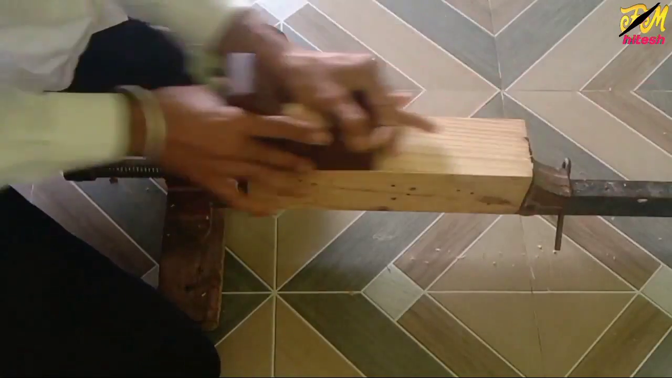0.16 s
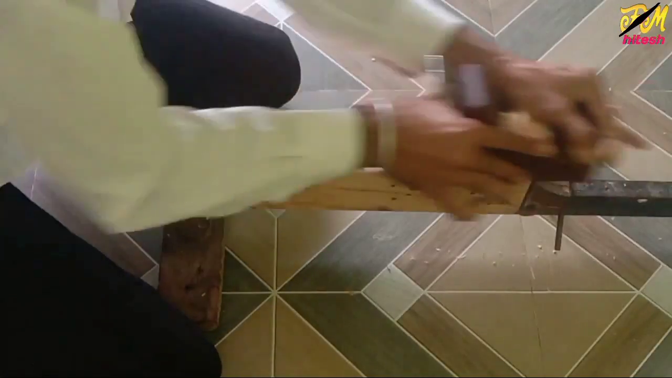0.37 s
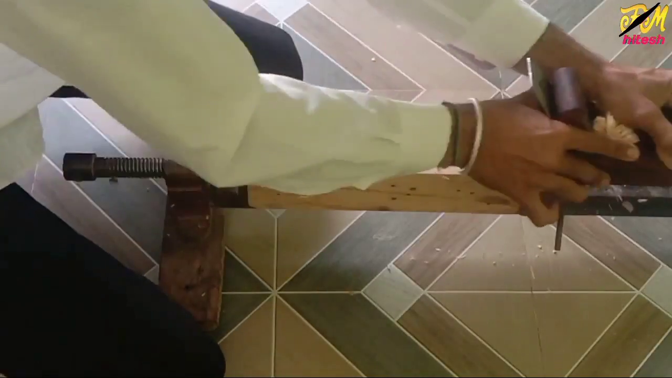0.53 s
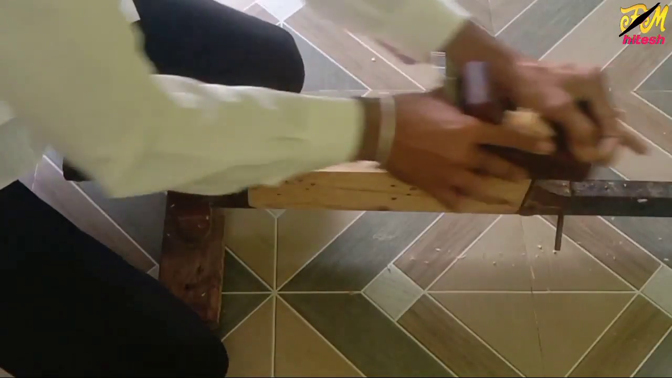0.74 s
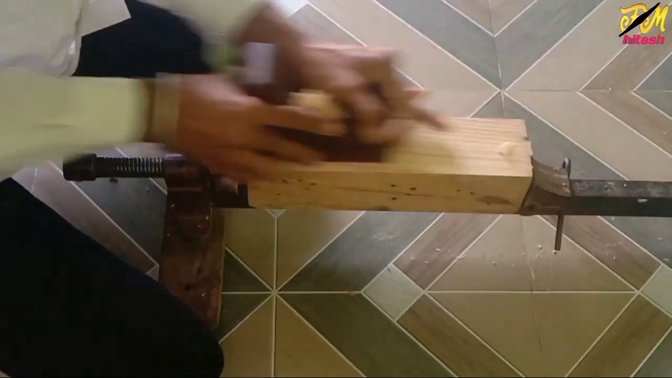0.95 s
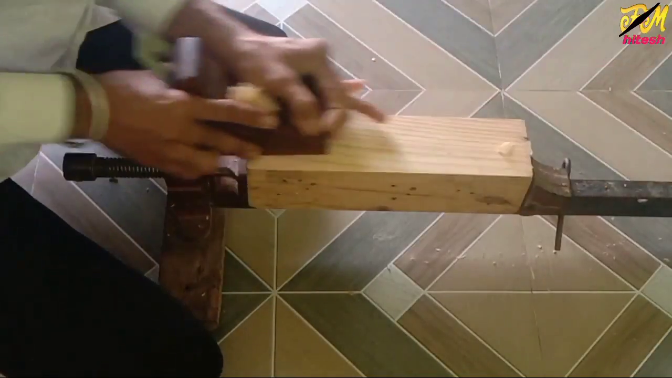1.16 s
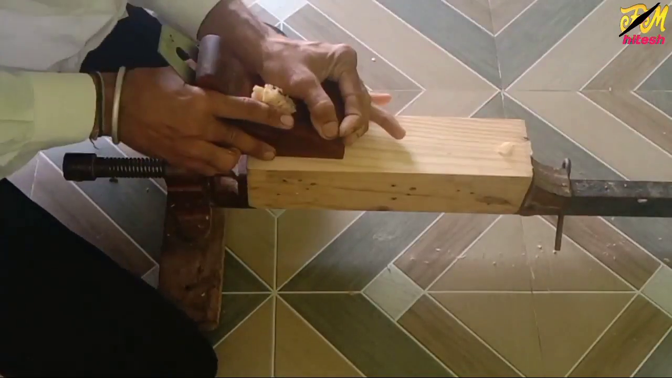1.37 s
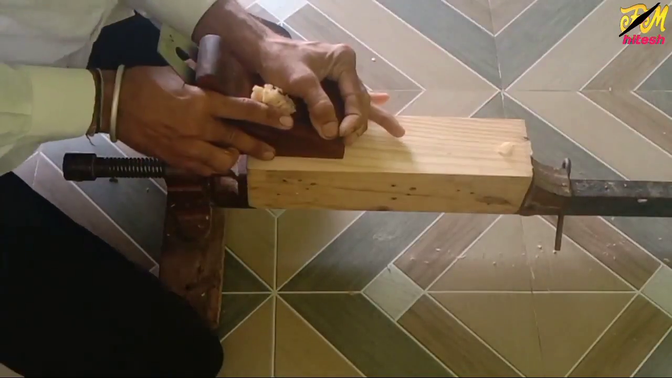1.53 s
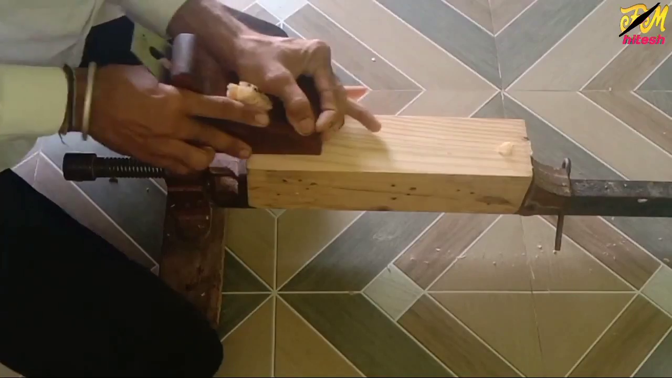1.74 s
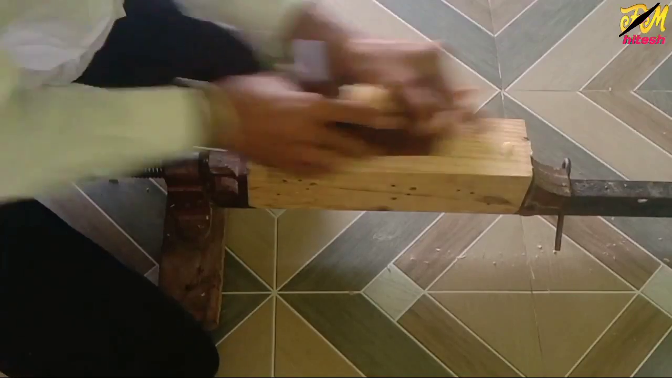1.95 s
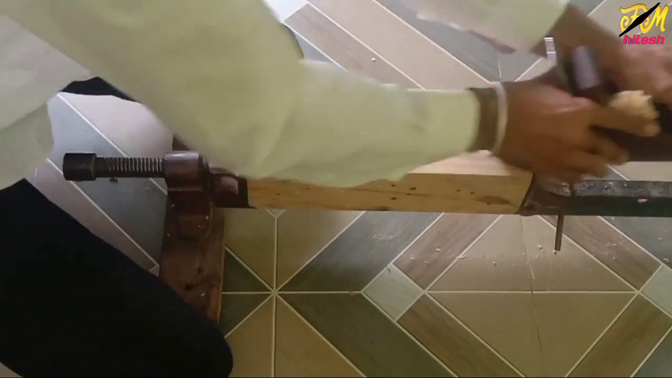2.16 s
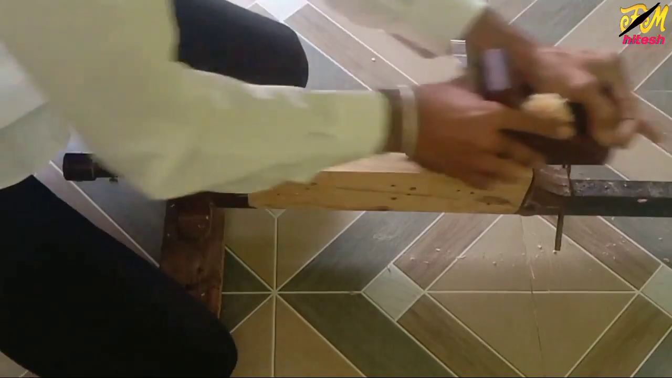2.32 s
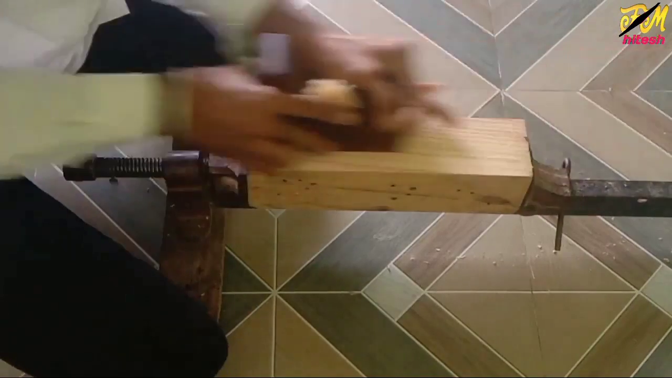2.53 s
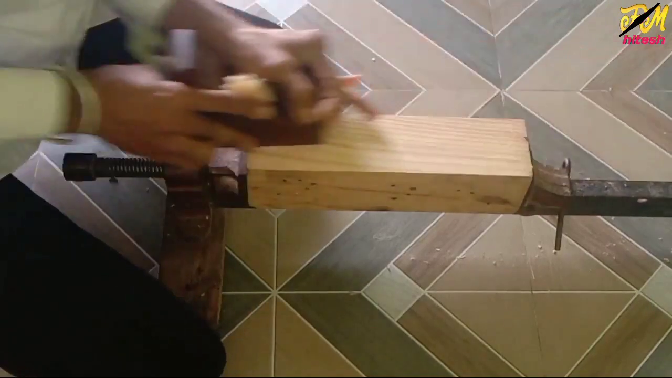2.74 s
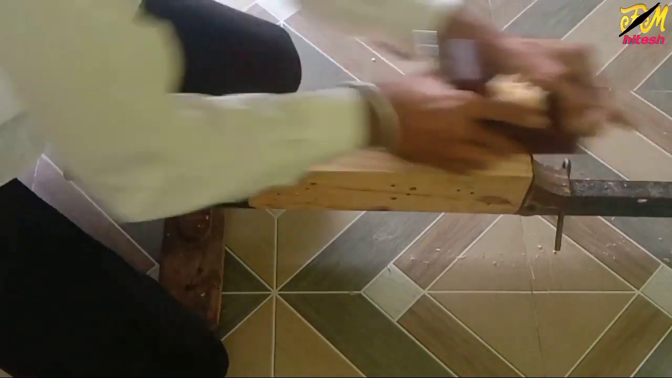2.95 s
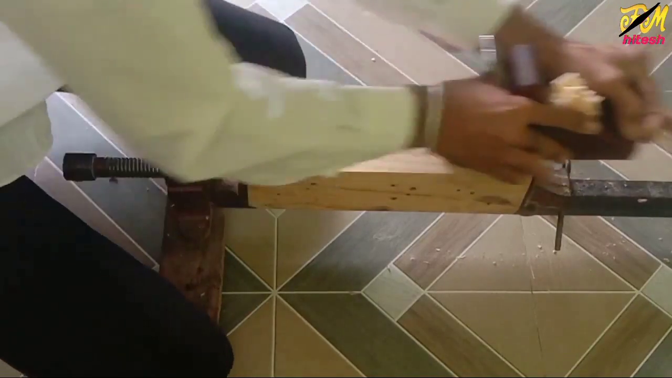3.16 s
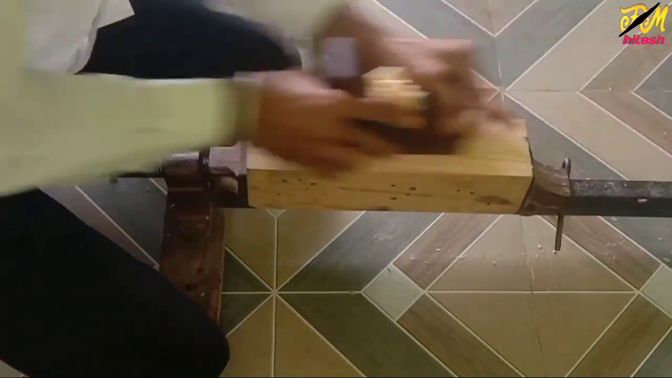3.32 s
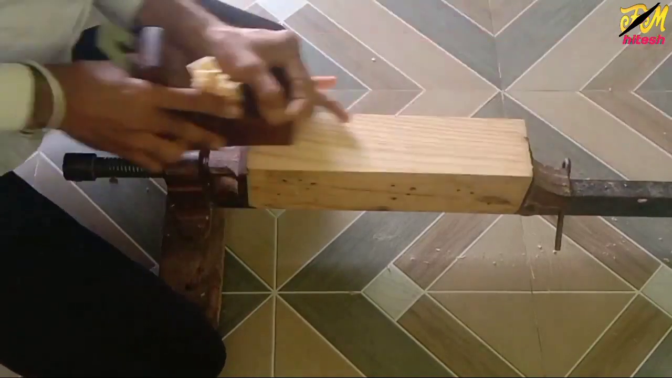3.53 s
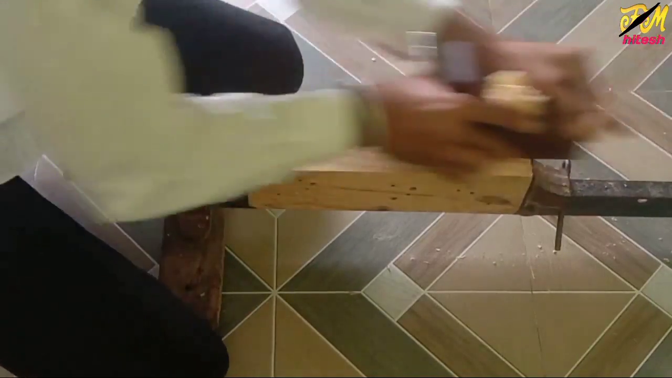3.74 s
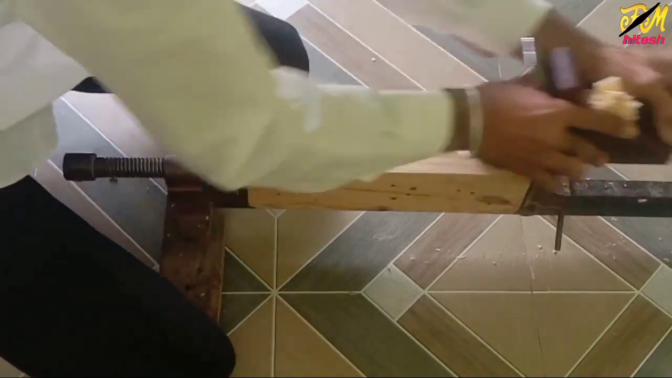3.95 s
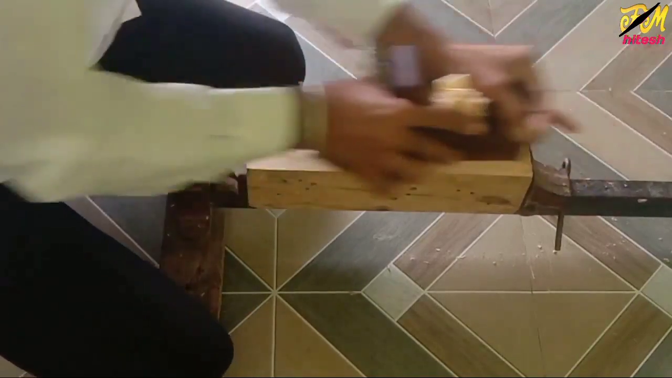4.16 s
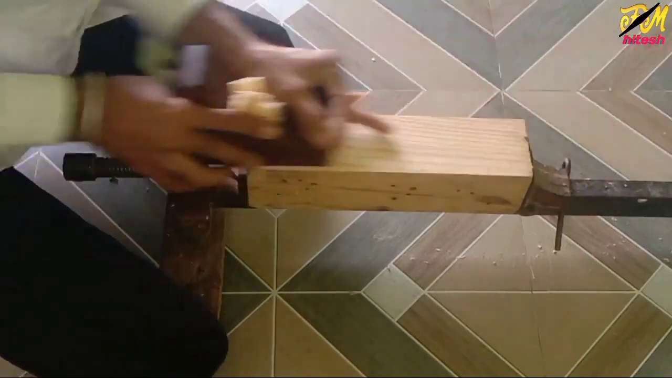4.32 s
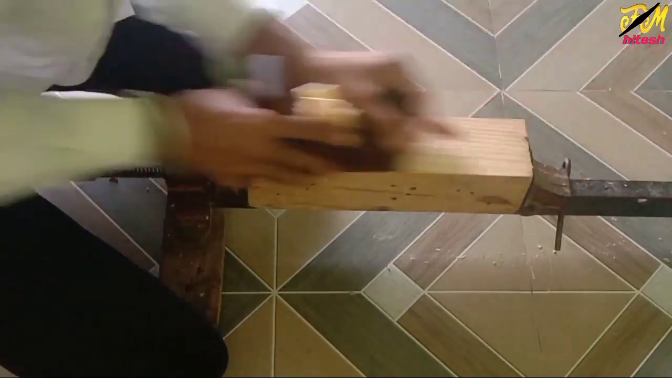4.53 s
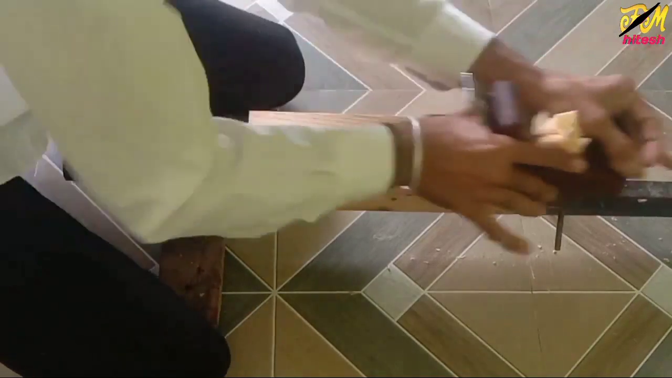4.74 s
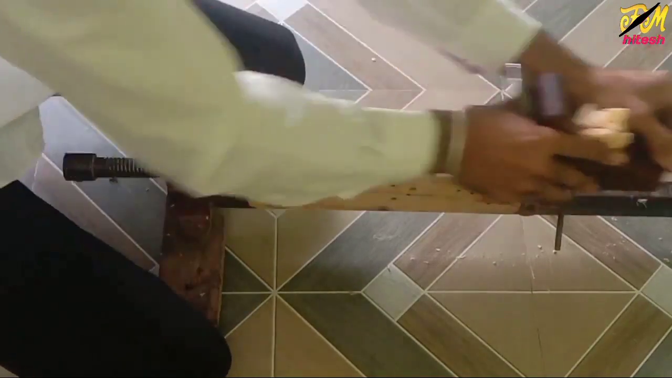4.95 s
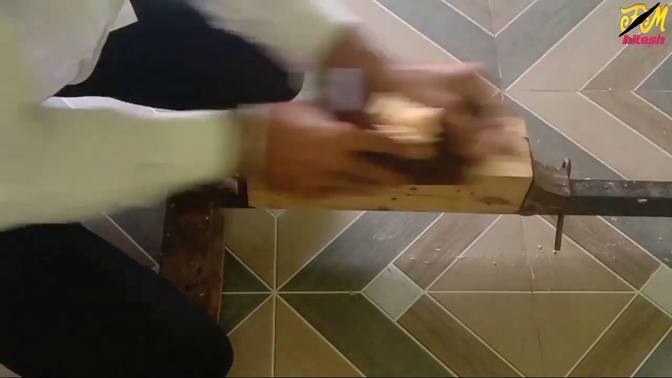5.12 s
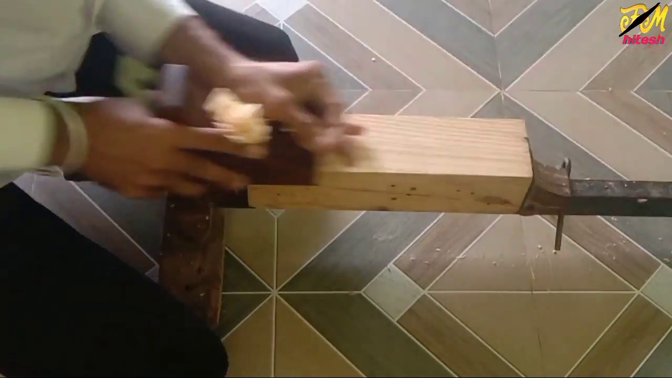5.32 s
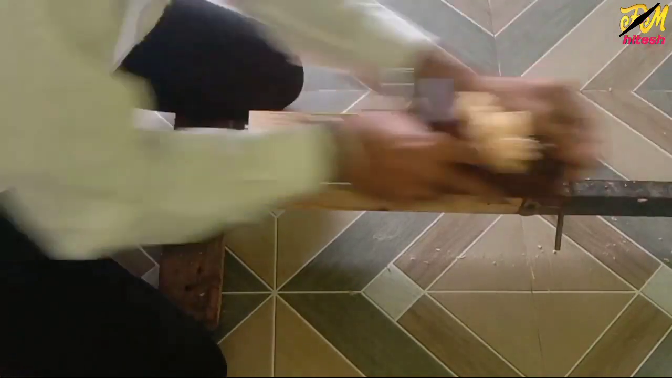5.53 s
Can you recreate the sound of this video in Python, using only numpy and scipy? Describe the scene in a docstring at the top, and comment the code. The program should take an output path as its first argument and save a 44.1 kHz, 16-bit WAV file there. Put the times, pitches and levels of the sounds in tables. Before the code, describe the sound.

A hand plane works a clamped wooden block. Crisp, tearing pushes with a hissing fizz start with a knock and alternate with softer, hollow rubbing slides back. An early push stalls almost at once, leaves a short lull, and is begun again; then the strokes follow steadily. Close, dry-edged mono sound in a bare tiled room with dense echoes and a very faint background.

```python
"""A wooden hand plane is worked along a clamped block in a bare, tiled room.
Stick-slip rubbing and fibre breakage excite the hollow body and iron as each push bites with a knock
and tears off a shaving; the plane then slides back more softly, its iron brushing the grain.
The second push stalls at once and is begun again. Jolts set the bench modes ringing, and dense echoes follow.
Table levels are those of the sources, before the gains of the mix and the room."""
import sys
import numpy as np
from scipy import signal
from scipy.fft import rfft, irfft
from scipy.io import wavfile
from scipy.ndimage import uniform_filter1d

SR = 44100
rng = np.random.default_rng(int(sys.argv[2]) if len(sys.argv) > 2 else 0)


def store_pcm(level_fs):
    """Save levels as 16-bit WAV."""
    pcm = np.round(np.clip(level_fs, -1, 1) * 32767).astype(np.int16)
    wavfile.write(sys.argv[1], SR, np.atleast_2d(pcm).T)


N = 246246
TIME = np.arange(N) / SR


def amp(db):
    """Level to amplitude: 20 dB is a factor of ten."""
    return 10 ** (np.asarray(db) / 20)


def unit(x):
    """Normalization: scales a signal to an rms of one."""
    return x / np.sqrt(np.mean(x ** 2) + 1e-20)


def ramp(t, length):
    """Linear onset: rises from zero to one over length seconds."""
    return np.clip(t / length, 0, 1)


def read(points, hz):
    """Spectral interpolation: reads levels along a log-frequency axis."""
    point_hz, value = np.transpose(points)
    return np.interp(np.log(hz + 1), np.log(point_hz + 1), value)


def add(mix, start_s, sound):
    """Superposition: adds a sound into the mix at its start time."""
    part = mix[max(round(start_s * SR), 0):][:len(sound)]
    part += sound[:len(part)]


def ring(spectrum, resonances, size=4096):
    """Minimum-phase response of energy one: a smooth spectrum lifted at each resonance."""
    hz = abs(np.fft.fftfreq(size, 1 / SR))
    db = read(spectrum, hz)
    for center_hz, width_hz, lift_db in resonances:
        db = db + lift_db / (1 + (2 * (hz - center_hz) / width_hz) ** 2)
    # the Hilbert transform of the log magnitude gives the causal phase
    log_response = np.conj(signal.hilbert(np.log(amp(db))))
    response = np.fft.ifft(np.exp(log_response)).real[:size // 2]
    return response / np.linalg.norm(response)


def sound_of(force, spectrum, resonances):
    """Linear response: a force convolved with the impulse response of a resonant body."""
    return signal.oaconvolve(force, ring(spectrum, resonances))[:N]


def resonate(x, hz, width):
    """Heterodyne resonance: a one-pole filter, of gain one, that follows the curve hz."""
    turn = np.exp(2j * np.pi * np.cumsum(hz) / SR)
    r = np.exp(-np.pi * width / SR)
    return 2 * (turn * signal.lfilter([1 - r], [1, -r], x / turn)).real


def unevenness(rate_hz, depth_db):
    """Random modulation: force swings as the contact crosses the grain, in a band below about rate_hz."""
    ratio = np.fft.rfftfreq(N, 1 / SR) / rate_hz
    spectrum = rfft(rng.standard_normal(N)) * ratio / (1 + ratio ** 2) ** 2
    swing = unit(irfft(spectrum, N))
    return unit(amp(depth_db * np.clip(swing, -2, 2)))


def slips(per_s, spread_db):
    """Shot noise: tiny slips and breaks at random moments; a positive spread makes a few far larger."""
    sizes = amp(spread_db * np.minimum(rng.exponential(1, N), 4))
    signs = rng.choice([-1, 1], N)
    happens = rng.random(N) < per_s / SR
    return unit(sizes * signs * happens)


# spectrum of the faint background: frequency_hz, relative_level_db
HUSH_SPECTRUM = [(30, -8), (200, 26), (1200, -38), (6000, -41), (16000, -12.5)]


def hush():
    """Filtered noise: a faint, steady background."""
    return amp(-73) * sound_of(rng.standard_normal(N), HUSH_SPECTRUM, [])


# slides back: start_s, light_glide_s, pressed_drag_s, drag_rub_db, drag_swish_db, glide_rub_db,
#   glide_swish_db
PULL_STROKES = [(-.15, 0.035, .16, -21.5, -28.5, -25, -31), (0.833, 0.12, 0.17, -24.5, -29, -47, -41),
                (1.748, 0.048, 0.1, -55, -55.5, -59.5, -53.5),
                (2.411, 0.21, 0.11, -32.5, -32, -37.5, -39.5), (3.329, 0.089, 0.19, -34, -33.5, -32.5, -36),
                (4.183, 0.13, 0.15, -25.5, -32.5, -31, -38), (5.108, 0.1, 0.12, -23, -28.5, -36, -33)]
GET_MOVING_S, BEAR_DOWN_S, EASE_OFF_S = 0.02, 0.035, 0.021
COAST_DB, COAST_DB_PER_S = -12.5, 64  # drop after the drag, then the rate of fading
LEAN_DB, GATHER_DB = 7, 1  # growth of the rub over the drag, and of the swish over the glide
IRON_LIFT_S = .12  # the iron comes clear of the grain this long after the drag


def pull_forces():
    """Friction under changing load: a light glide gathers speed, then a pressed drag coasts to rest."""
    rub, swish = np.zeros((2, N))
    for start_s, glide_s, drag_s, rub_db, swish_db, glide_rub_db, glide_swish_db in PULL_STROKES:
        t = TIME - start_s
        pressed = ramp(t - glide_s, BEAR_DOWN_S)
        past_end = np.maximum(t - glide_s - drag_s, 0)
        coast_db = COAST_DB * ramp(past_end, EASE_OFF_S) - COAST_DB_PER_S * past_end
        motion = ramp(t, GET_MOVING_S) * amp(coast_db)
        lean_db = LEAN_DB * (ramp(t - glide_s, drag_s) - .5)
        gliding_db = glide_swish_db + GATHER_DB * (ramp(t, glide_s) - .5)
        iron_contact = 1 - ramp(past_end, IRON_LIFT_S)
        rub += motion * amp(glide_rub_db + pressed * (rub_db + lean_db - glide_rub_db))
        swish += motion * amp(gliding_db + pressed * (swish_db - gliding_db)) * iron_contact
    return rub, swish


# spectrum of the iron brushing backwards: frequency_hz, relative_level_db
SWISH_SPECTRUM = [(100, -45), (1000, 1.5), (2200, -9), (3000, 1.5), (3700, -3), (4450, -9.5), (5200, -3.5),
                  (6600, -3), (8200, -17), (10300, -18.5), (13300, -30), (14900, -13), (16000, -16)]
WHISTLE_HZ, WHISTLE_WIDTH_HZ, WHISTLE_DB = 3940, 250, -4.5  # width of each of two cascaded resonances


def drag():
    """Friction-excited resonance: the iron only brushes the grain, with a rough whistle of steady pitch."""
    speed = pull_forces()[1] * unevenness(rate_hz=44, depth_db=1.95)
    brushing = slips(per_s=5000, spread_db=-1.5)
    hz = np.full(N, WHISTLE_HZ)
    whistle = resonate(slips(per_s=670, spread_db=7.0), hz, WHISTLE_WIDTH_HZ)
    whistle = resonate(whistle, hz, WHISTLE_WIDTH_HZ)
    swish = amp(0.43) * sound_of(speed * brushing, SWISH_SPECTRUM, [])
    return swish + amp(WHISTLE_DB) * speed * unit(whistle)


# spectrum of the rubbing sole: frequency_hz, relative_level_db
RUB_SPECTRUM = [(30, -55), (90, -33.5), (160, -25), (300, -26.5), (600, -19.5), (850, -8.5), (1050, 2.5),
                (1350, 0.5), (1500, -5.5), (2200, -10.5), (4000, -12.5), (16000, -48)]
# resonances of the hollow body, driven by the sole: center_hz, width_hz, lift_db
HOLLOW_RESONANCES = [(1240.6, 162, 8.5), (1283.6, 69, 9.5), (1630, 220, 8), (1910, 86, 4.5), (2260, 74, 2)]
# brief hoots of the rubbing sole: start_s, peak_db
SOLE_HOOTS = [(1.056, -6.5), (1.106, -13), (3.705, -12), (4.201, -24), (4.99, -19), (5.225, -13.5)]


def sole():
    """Stick-slip friction: the sole rubs both ways on a hollow body; now and then it gives a brief hoot."""
    pressure = push_forces()[0] + pull_forces()[0]
    force = pressure * slips(per_s=3000, spread_db=-3.5) * unevenness(rate_hz=110, depth_db=0.5)
    out = sound_of(force, RUB_SPECTRUM, HOLLOW_RESONANCES)
    hoot = ring(RUB_SPECTRUM, HOLLOW_RESONANCES)
    for start_s, peak_db in SOLE_HOOTS:
        add(out, start_s, amp(peak_db) * hoot / abs(hoot).max())
    return out


# the plane jolts block and bench: start_s, level_db, judder_length_s, upper_edge_hz (hardness),
#   ringing_over_level_db (used by the bench)
JOLTS = [(.064, -28, 0.031, 1130, -10), (0.233, -34.5, 0.05, 720, 4.5), (1.02, -71, 0.033, 890, 3.5),
         (1.135, -48, 0.037, 402, 10.5), (1.297, -29, 0.027, 930, -4), (1.316, -26.5, 0.011, 1732, 2),
         (1.347, -25, 0.027, 2000, -15), (1.913, -38, 0.14, 500, 2.5), (2.514, -42.5, 0.027, 700, -17),
         (2.724, -42.5, 0.047, 725, -1.5), (2.861, -35, 0.069, 690, 5), (2.887, -30, 0.022, 718, -2),
         (3.565, -44, 0.054, 497, 2), (3.704, -31, 0.037, 710, -3), (4.222, -45.5, 0.044, 620, -4),
         (4.442, -33, 0.022, 460, -31), (4.579, -28.5, 0.038, 820, -0.5), (5.33, -28.5, 0.013, 740, -12),
         (5.464, -47, 0.0098, 900, -8)]
# spectrum of wood on wood: frequency_hz, relative_level_db
THUD_SPECTRUM = [(30, -21.5), (80, -16), (130, -8), (200, -3.5), (330, 0.5), (560, 3.5), (780, 7.5),
                 (1200, 8), (1700, 6), (2300, 4), (5000, -17), (16000, -55.5)]


def knocks():
    """Impact excitation: each jolt is a short judder of dull blows, brighter for a harder contact."""
    out, t = np.zeros(N), np.arange(SR // 4) / SR
    for start_s, level_db, length_s, edge_hz, _ in JOLTS:
        blows = rng.standard_normal(len(t)) * np.exp(-(t / length_s) ** 4)
        b, a = signal.butter(2, min(edge_hz, SR / 4), fs=SR)
        blows = signal.lfilter(b, a, blows)
        shake = signal.fftconvolve(blows, ring(THUD_SPECTRUM, []))
        # the energy grows with the length of the judder
        add(out, start_s, amp(level_db) * shake * np.sqrt(length_s * SR) / np.linalg.norm(shake))
    return out


# modes of the clamped block and bench: frequency_hz, level_db, t60_s
BENCH_MODES = [(101, -26.5, 1), (164.1, -8, 0.73), (179.7, -6.5, 0.67), (229, -11.5, 0.37),
               (338.5, -18, 0.1), (459, -7, 0.61), (695, 3, 0.27), (759, -0.5, 0.42), (850, -12.5, .4),
               (1010, -13, .4), (1106, -9, 0.45), (1182, 8.5, 0.27), (1304, 3, 0.55), (1660, -3, 0.6),
               (1720, 4, 0.34), (1750, 2, 0.22), (2200, -13.5, 0.4)]


def bench():
    """Modal decay: block and bench ring on after each jolt; a soft jolt reaches only the low modes."""
    out, t = np.zeros(N), np.arange(SR) / SR
    hz, mode_db, t60 = np.transpose(BENCH_MODES)[:, :, None]
    onset = 1 - np.exp(-t / 0.0031)
    for start_s, level_db, _, edge_hz, ring_db in JOLTS:
        reach = 1 / np.sqrt(1 + (hz / edge_hz) ** 4)
        decay = amp(mode_db - 60 * t / t60)
        modes = reach * decay * np.sin(2 * np.pi * (hz * t + rng.random(hz.shape)))
        add(out, start_s, amp(level_db + ring_db) * modes.sum(0) * onset)
    return out


# pushes: start_s, entry_s, full_cut_s, tearing_db, entry_against_full_cut_db, bite_surge_db, fizz_db,
#   fastest_after_start_s, sole_rub_db, rub_growth_over_cut_db, slide_on_after_cut_s, run_out_db_per_s
PUSH_STROKES = [(0.225, .054, 0.17, -21.5, -5, 7, -23.5, 0.2, -15.5, 2, 0.16, 68),
                (1.295, 0.0042, 0.027, -29.5, -0.5, 4.5, -37, 0.027, -16.5, -3.5, .01, 496.5),
                (1.876, 0.035, 0.21, -22, -28.5, -4, -20.5, .2, -24, -10, .03, 84),
                (2.856, .029, 0.2, -22.5, -7, 4, -17, 0.14, -31.5, 9, 0.064, 78),
                (3.702, 0.091, 0.1, -25, -4.5, 10.5, -22.5, 0.13, -24, -6, 0.054, 73),
                (4.576, 0.094, .11, -22, 0, 8.5, -23, 0.15, -16, -7.5, 0.13, 64),
                (5.464, 0.013, 0.17, -22.5, -1.5, 6.5, -28, 0.07, -16.5, -15, .1, 66)]
PUSH_ATTACK_S, BITE_S = 0.0013, 0.018  # onset of contact and cut; decay time of the bite's surge
FAST_WIDTH_S, SLOW_FIZZ_DB = 0.026, -9.5  # width of the fizz peak; fizz of a slow cut against that peak
# the sole takes the weight only once the iron has bitten: time to settle, and the rub before that
SETTLE_S, UNSETTLED_DB = 0.063, -10
EXIT_DB, EXIT_S = -6.5, 0.09  # drop of tearing and fizz as the iron leaves the wood
# past the cut: shares of the run-out rate that fizz and rub follow, and the rub's drop as the sole lifts
FIZZ_RUN_OUT, RUB_RUN_OUT, LIFT_DB = 1.4, 0.72, -6.5
# shares of the entry's level that fizz and rub follow, and of the bite's surge that fizz follows
FIZZ_DEPTH, RUB_DEPTH, FIZZ_SURGE = 0.5, 0.58, 0.96


def push_forces():
    """Cutting force follows depth and speed: the iron enters, bites into the full cut, then runs out."""
    rub, tear, fizz = np.zeros((3, N))
    for (start_s, entry_s, cut_s, tear_db, entry_db, bite_db, fizz_db, fastest_s,
         rub_db, growth_db, slide_s, fade_db_per_s) in PUSH_STROKES:
        t = TIME - start_s
        contact, cutting = ramp(t, PUSH_ATTACK_S), ramp(t - entry_s, PUSH_ATTACK_S)
        in_cut = np.maximum(t - entry_s, 0)
        past_end = np.maximum(t - entry_s - cut_s, 0)
        depth_db = (1 - cutting) * entry_db
        surge_db = cutting * bite_db * np.exp(-in_cut / BITE_S)
        fast = np.exp(-((t - fastest_s) / FAST_WIDTH_S) ** 2 / 2)
        settle_db = UNSETTLED_DB * (1 - ramp(in_cut, SETTLE_S))
        weight_db = settle_db + growth_db * (ramp(in_cut, cut_s) - .5)
        # when fastest, the tearing gives way by the fizz's lead over it
        thin_db = max(fizz_db - tear_db, 0) * fast
        edge_db = FIZZ_DEPTH * depth_db + FIZZ_SURGE * surge_db + SLOW_FIZZ_DB * (1 - fast)
        lift_db = LIFT_DB * ramp(past_end - slide_s, EXIT_S)
        run_out_db = -fade_db_per_s * past_end
        exit_db = EXIT_DB * ramp(past_end, EXIT_S)
        rub += contact * amp(rub_db + RUB_DEPTH * depth_db + weight_db + lift_db + RUB_RUN_OUT * run_out_db)
        tear += contact * amp(tear_db + depth_db + surge_db - thin_db + exit_db + run_out_db)
        fizz += contact * amp(fizz_db + edge_db + exit_db + FIZZ_RUN_OUT * run_out_db)
    return rub, tear, fizz


# spectra of coarse tearing and fine fizz: frequency_hz, relative_level_db
TEAR_SPECTRUM = [(30, -45.5), (150, -17), (400, -23), (800, -13), (1150, -3), (1550, 0), (2100, -0.5),
                 (2400, -3.5), (2950, 3.5), (3500, -3), (4400, -22), (7000, -11.5), (16000, -41)]
FIZZ_SPECTRUM = [(100, -31.5), (2000, -36.5), (3700, 0), (4400, -3.5), (5200, 3), (6600, 0), (8200, -14.5),
                 (10300, -13), (12000, -21), (13500, -22), (14900, -7.5), (16000, -16)]
# resonances of the plane's body and iron: center_hz, width_hz, lift_db
PLANE_RESONANCES = [(1190, 54, 9.5), (1544, 100, 5.5), (1870, 17, 4.5), (2110, 20, 6), (2770, 210, 2.5),
                    (3300, 177, 6.5), (3903, 205, 10.5), (5800, 180, 4.5), (6560, 63, 9)]


def shaving():
    """Fibre fracture: the iron splits fibres in quick clumps, a coarse tearing with fine fizz on top."""
    _, tearing, fizzing = push_forces()
    clumps = unevenness(rate_hz=80, depth_db=1.5)
    hard_grain = unevenness(rate_hz=148, depth_db=1)  # bands of hard wood make the coarse tearing lurch
    coarse_force = tearing * clumps * hard_grain * slips(per_s=2500, spread_db=2.0)
    fine_force = fizzing * clumps * slips(per_s=7200, spread_db=5.0)
    coarse = sound_of(coarse_force, TEAR_SPECTRUM, PLANE_RESONANCES)
    fine = sound_of(fine_force, FIZZ_SPECTRUM, PLANE_RESONANCES)
    return amp(3.07) * coarse + amp(4.33) * fine


# brief bright snaps, in pushes and slides back: start_s, peak_db
BRIGHT_SNAPS = [(0.231, -12), (0.846, -25), (1.295, -14), (1.876, -37), (2.462, -26), (2.86, -30),
                (2.895, -16), (3.34, -33), (3.567, -11.5), (3.706, -5.5), (3.853, -23), (4.578, -26),
                (5.471, -10)]
# the iron chatters on hard grain: start_s, relative_level_db, length_s, slip_rate_hz
IRON_CHATTERS = [(3.791, -6, .009, 960), (3.817, -33, .012, 945)]
# resonances of the chattering iron: center_hz, width_hz, lift_db
IRON_RESONANCES = [(1880, 310, 12.5), (3340, 610, 14.5)]


def snaps():
    """Impulse response: single snaps of plane on wood, and regular slips where the iron chatters."""
    out = np.zeros(N)
    snap = amp(-0.5) * ring(TEAR_SPECTRUM, PLANE_RESONANCES) + ring(FIZZ_SPECTRUM, PLANE_RESONANCES)
    for start_s, peak_db in BRIGHT_SNAPS:
        add(out, start_s, amp(peak_db) * snap / abs(snap).max())
    slip = ring(TEAR_SPECTRUM, IRON_RESONANCES)
    for start_s, level_db, length_s, rate_hz in IRON_CHATTERS:
        for delay in np.arange(0, length_s, 1 / rate_hz):
            add(out, start_s + delay, amp(level_db) * slip * np.sqrt(SR / rate_hz) / 2)
    return out


# low growls under the sole, mostly early in a push, one in a slide back:
#   start_s, length_s, level_db, first_hz, last_hz
SOLE_GROWLS = [(0.299, 0.057, -22.5, 630, 820), (1.767, 0.2, -49.5, 1040, 1080),
               (1.916, 0.1, -19, 520, 670), (4.569, 0.067, -26.5, 760, 915), (5.464, 0.032, -22, 740, 850)]
# spectrum of the growling friction: frequency_hz, relative_level_db
GROWL_SPECTRUM = [(30, -40), (300, -44), (520, -8), (900, 8), (2000, 1), (2600, -22), (5000, 3.5),
                  (16000, -68)]


def growl():
    """Moving resonance: friction under the sole growls through three broad resonances that rise."""
    out = np.zeros(N)
    friction = sound_of(slips(per_s=2000, spread_db=-10.5), GROWL_SPECTRUM, [])
    for start_s, length_s, level_db, first_hz, last_hz in SOLE_GROWLS:
        part = friction[(TIME >= start_s) & (TIME < start_s + length_s)]
        hz = np.linspace(first_hz, last_hz, len(part))
        voiced = sum(resonate(part, k * hz, width=400) for k in (1, 2, 3))
        add(out, start_s, amp(level_db) * unit(voiced) * signal.windows.tukey(len(part), .2))
    return out


# reverberation time of the room: frequency_hz, t60_s
ROOM_DECAY = [(100, 1), (500, 1), (1300, 0.56), (3200, 0.52), (6400, 0.67), (9000, 0.4), (15000, 0.23)]


def reflections():
    """Diffuse reverberation: dense echoes from tile and plaster, of energy one, the top treble dying first."""
    t = np.arange(SR) / SR
    echoes = rng.choice([-1, 1], SR) * (rng.random(SR) < 4000 / SR)  # 4000 per second
    taps = echoes * (t > .004)
    hz, when, z = signal.stft(taps, SR, nperseg=256)
    decay = amp(-60 * when / read(ROOM_DECAY, hz)[:, None])
    decay = decay / np.linalg.norm(decay, axis=1, keepdims=True)
    tail = signal.istft(z * decay, SR, nperseg=256)[1]
    return tail / np.linalg.norm(tail)


def room(x, direct_db, tail_db, count=4):
    """Direct and reverberant fields: the echo pattern shifts steadily as the plane travels, then recurs."""
    place = 14 * TIME % count  # 14 patterns per second, in a cycle
    wet = np.zeros(N)
    for k in range(count):
        distance = abs((place - k + count / 2) % count - count / 2)
        share = np.cos(np.pi / 2 * np.minimum(distance, 1))  # crossfade of equal power
        wet += signal.fftconvolve(x * share, reflections())[:N]
    return amp(direct_db) * x + amp(tail_db) * wet


def scene():
    """Superposition: the plane in the room, the ringing bench and the hush, the same in both channels."""
    work = sole() + growl() + shaving() + drag() + knocks() + snaps()
    mono = room(work, direct_db=-4.0, tail_db=-6.5) + amp(-3) * bench() + hush()
    return np.array([mono, mono])


EDGE_HZ = 15700


def record(dry):
    """Downward expansion: the quietest moments drop by up to 9 dB; then a low-pass limits the band."""
    power = abs(uniform_filter1d(dry[0] ** 2, size=1300))  # mean over about 29 ms
    level_db = 10 * np.log10(power + 1e-12)
    quiet = dry * amp(np.clip(level_db + 51.0, -9, 0))
    low_pass = signal.firwin(511, EDGE_HZ, window=("kaiser", 9), fs=SR)
    return signal.oaconvolve(quiet, low_pass[None], "same")


dry = scene()
out = record(dry)
store_pcm(out)
```